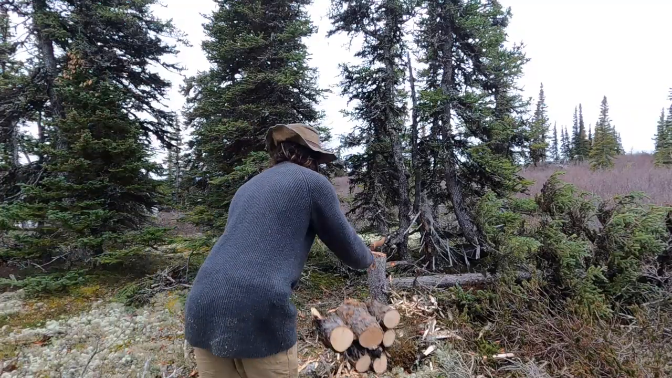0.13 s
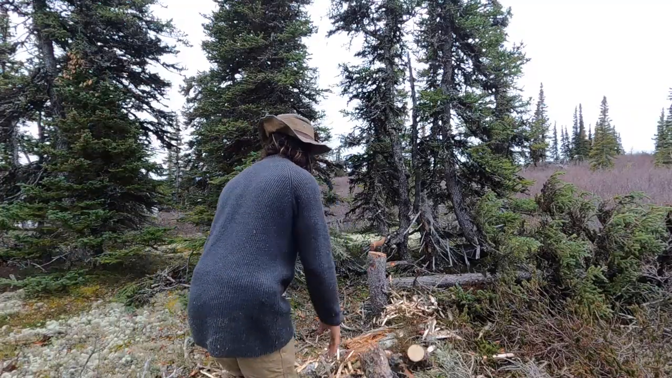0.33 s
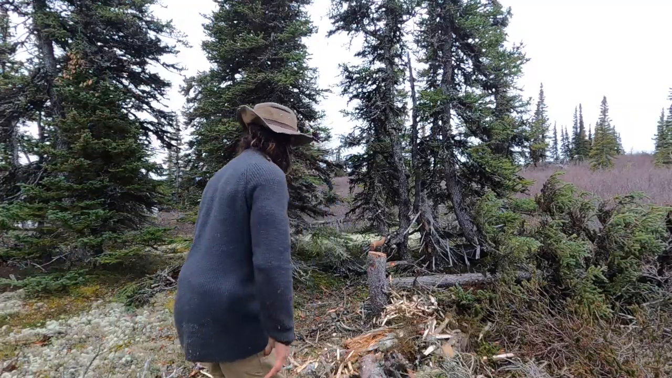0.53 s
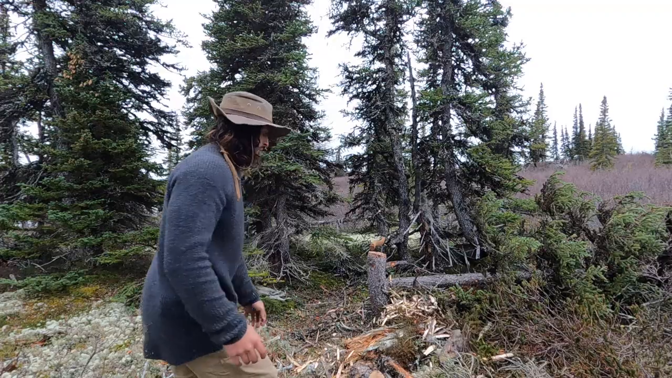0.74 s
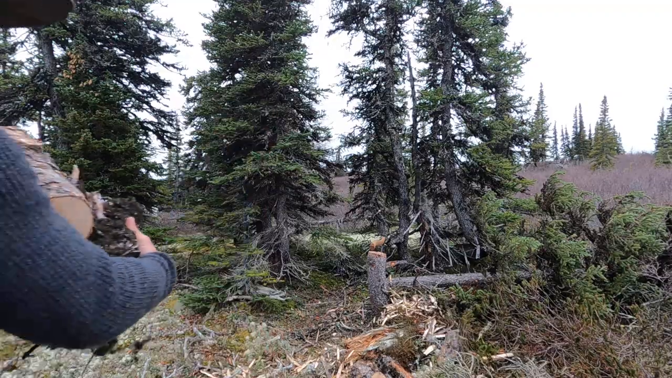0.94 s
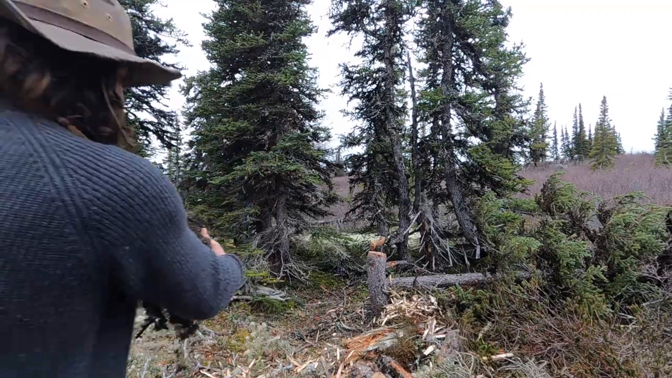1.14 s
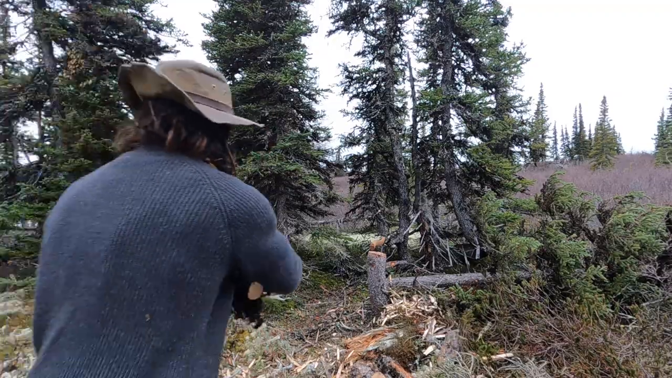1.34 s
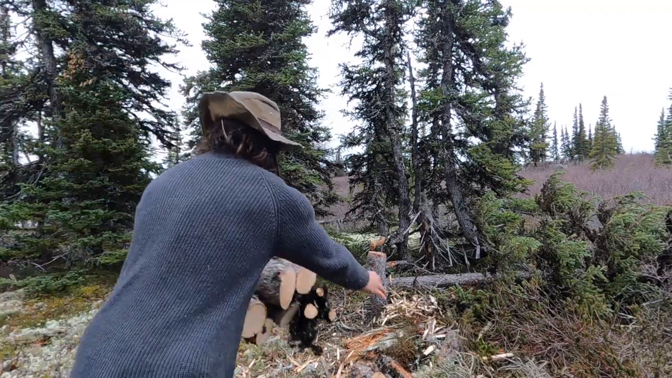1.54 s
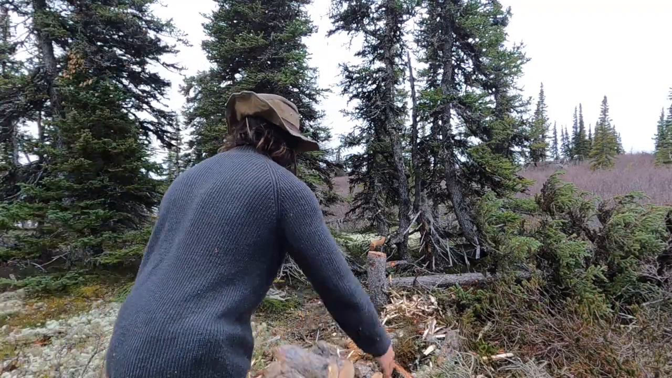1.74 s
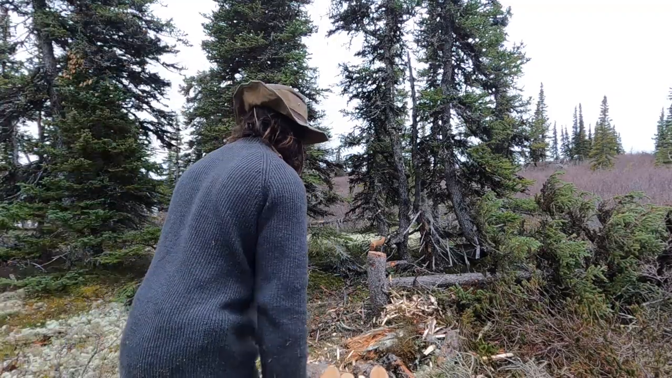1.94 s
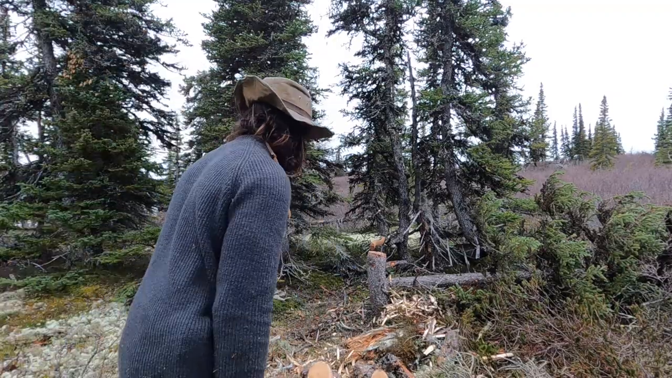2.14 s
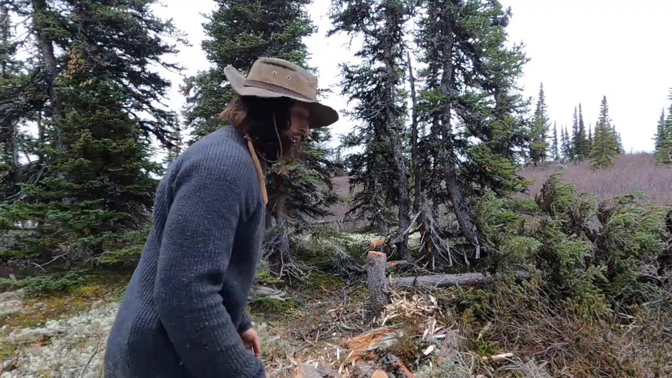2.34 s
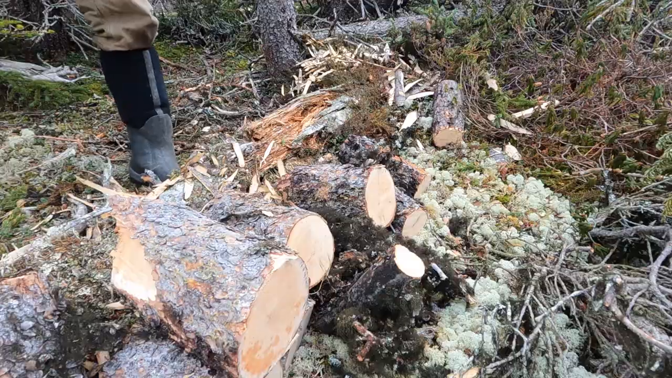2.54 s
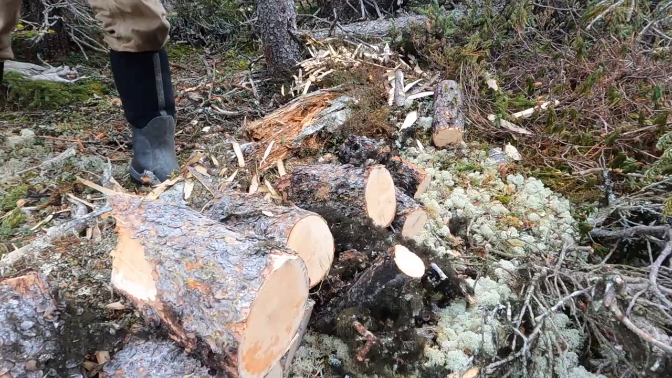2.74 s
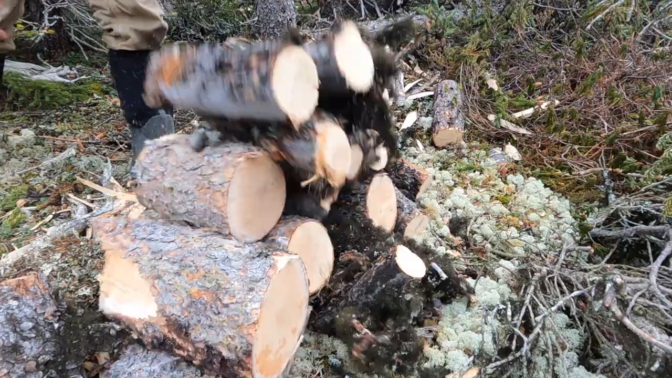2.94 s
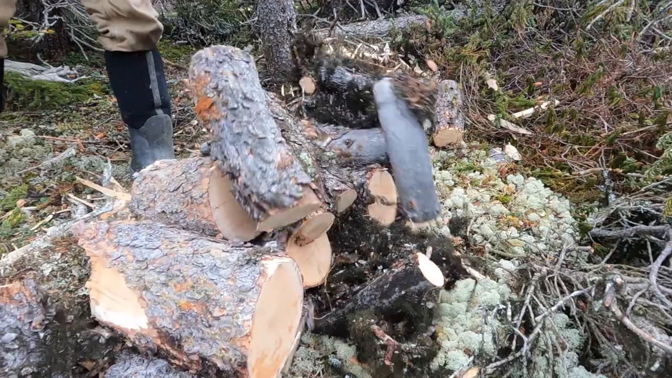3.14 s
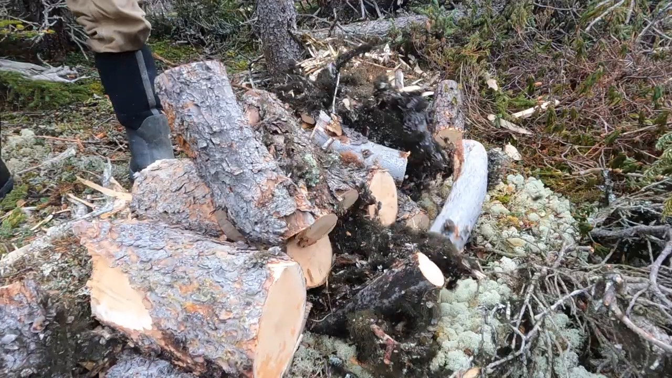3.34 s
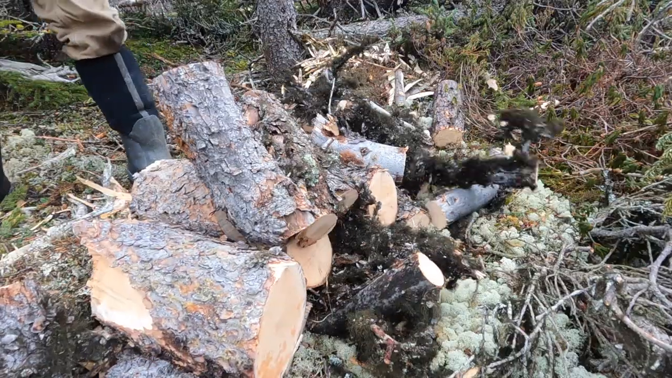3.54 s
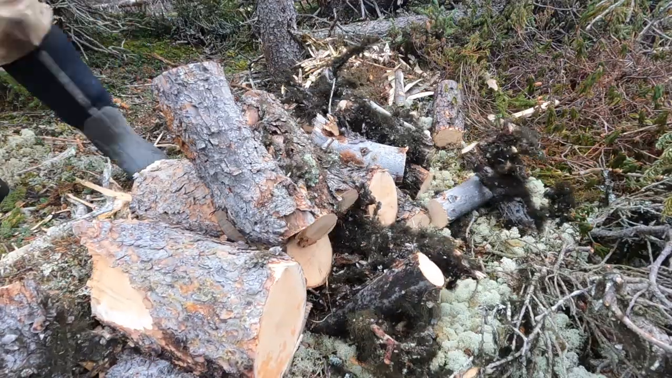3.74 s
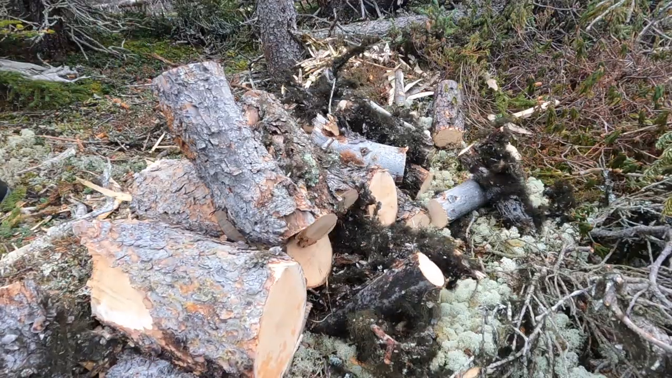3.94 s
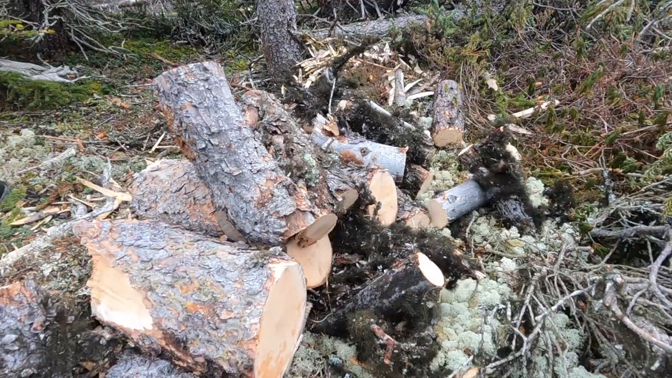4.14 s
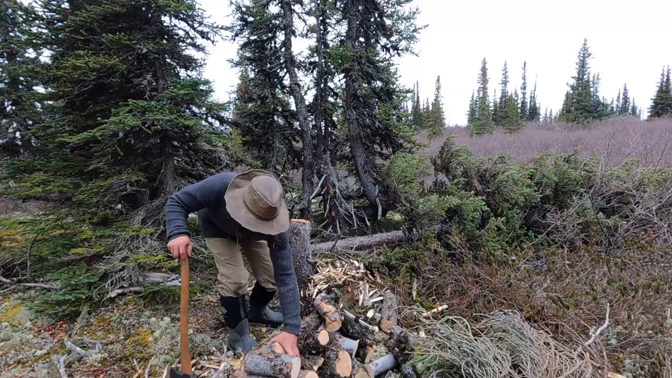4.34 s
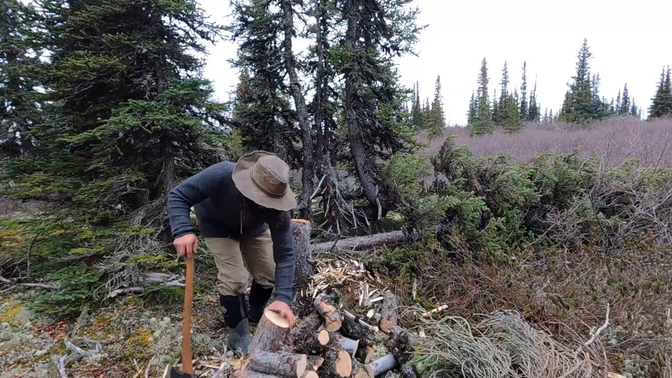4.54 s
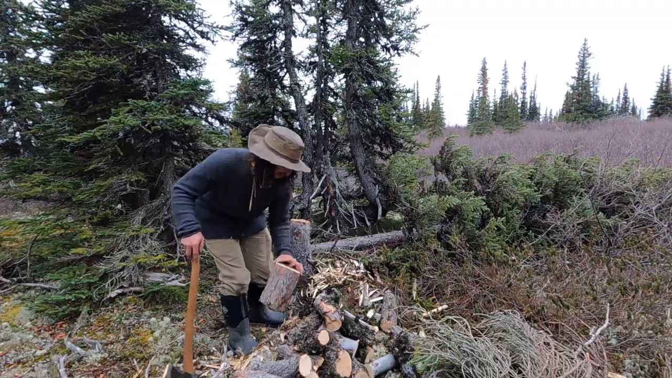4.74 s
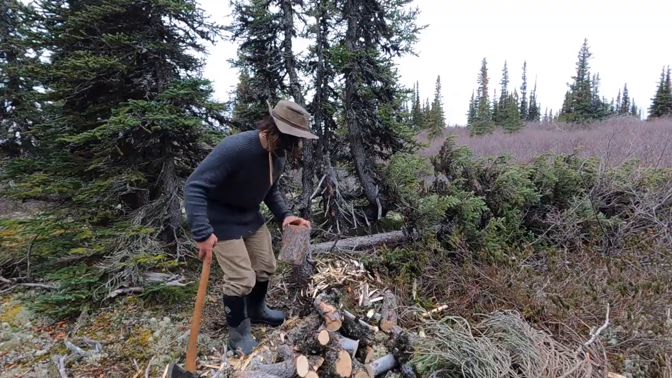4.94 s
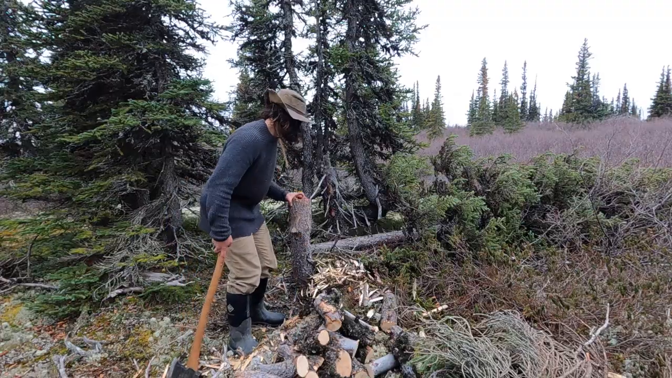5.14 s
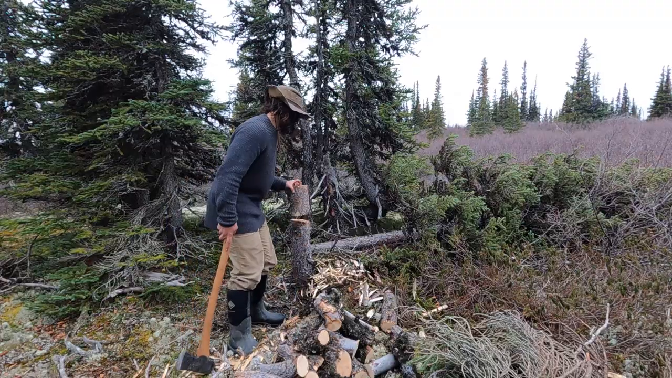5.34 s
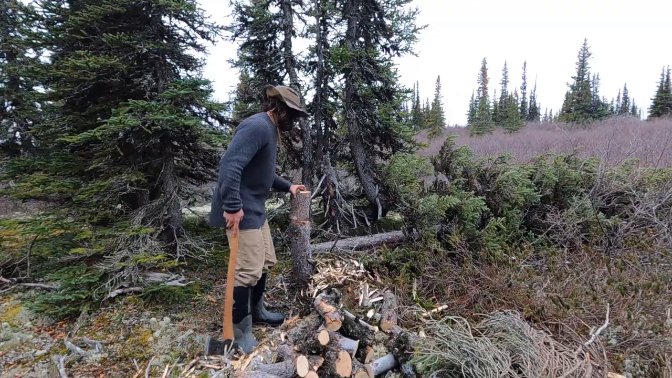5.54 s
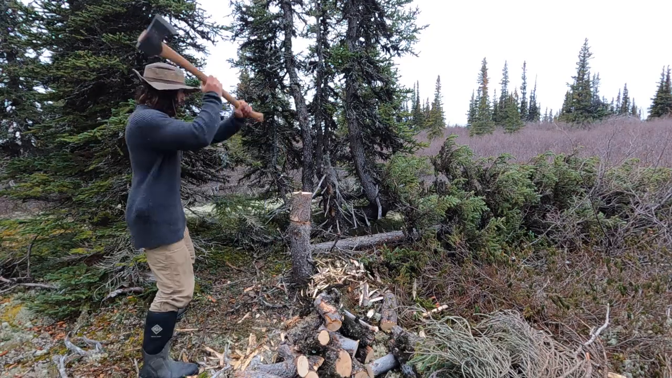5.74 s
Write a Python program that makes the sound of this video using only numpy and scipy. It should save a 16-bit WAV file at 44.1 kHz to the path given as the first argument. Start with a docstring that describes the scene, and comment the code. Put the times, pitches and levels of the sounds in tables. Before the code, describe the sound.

In an open forest with a faint breeze, cut logs thud onto a pile close by. Cloth and bark rustle among light knocks, then two more heavy loads tumble down, with crunching bark, snapping twigs and the clack of dry sticks. As the pile settles with small crackles, a far bird gives three short, thin calls. A single log clunks after the first call, and two soft knocks follow at the end.

```python
"""Armfuls of fresh log rounds are dropped on a pile in an open forest, air moving in the trees.
The first lands at 0.3 s: short damped thuds while bark and twigs crack. Lighter knocks follow, then
heavy loads at 1.9 s and 3 s; bark grinds, dry sticks ring, and moss, brush and cloth rustle between.
The wood settles. From 4.7 s a far bird calls three times; one more round lands just after
its first call, and two faint knocks end the scene."""
import sys
import numpy as np
from scipy import signal
from scipy.fft import rfft, irfft
from scipy.io import wavfile
from scipy.ndimage import uniform_filter1d

SR = 44100
rng = np.random.default_rng(int(sys.argv[2]) if len(sys.argv) > 2 else 0)


def wav_record(signal):
    """Record a signal, one row per channel, as 16-bit PCM in the file named by sys.argv[1]."""
    frames = np.transpose(np.atleast_2d(signal))
    bounded = np.clip(frames, -1, 1)
    # unit amplitude maps onto the largest positive 16-bit level
    quanta = np.round(bounded * 32767).astype(np.int16)
    wavfile.write(sys.argv[1], SR, quanta)


N = 254748

# handling and air: time_s, rustle_db, rush_db
STIR = [(0, -44.5, -55), (0.25, -49, -45.5), (0.45, -35.5, -52), (0.7, -40, -54), (0.9, -32, -43.5),
        (0.98, -41, -49), (1.1, -26.5, -40), (1.3, -32.5, -44), (1.4, -41.5, -50), (1.73, -40.5, -45.5),
        (2.0, -40.5, -50), (2.34, -45.5, -53), (2.58, -41, -52.5), (3.02, -45.5, -56), (3.28, -34.5, -42.5),
        (3.43, -34.5, -63), (3.65, -41, -58.5), (4.0, -51.5, -54.5), (4.55, -52.5, -52.5),
        (4.8, -43.5, -50.5), (5.13, -56, -52.5), (5.776, -69, -52.5)]
# rounds on wood or ground: start_s, level_db, pitch_hz, thump_db (pile, re level)
THUDS = [(0.3255, -14.5, 300, -8.5), (0.3393, -4, 590, -11), (0.3527, -22, 357, -4),
         (0.8209, -30.5, 288, -12), (0.8339, -25.5, 670, -8.5), (0.8516, -35, 385, -14),
         (1.04, -31.5, 397, -14), (1.097, -20.5, 626, -15), (1.2211, -29, 560, -16),
         (1.265, -24, 577, -12.5), (1.2876, -33.5, 447, -6.5), (1.401, -38.5, 310, -11.5),
         (1.6312, -36.5, 380, -23), (1.7713, -25, 466, -12.5), (1.7778, -28, 348, -10),
         (1.827, -11.5, 480, -9), (1.844, -16.5, 670, -37), (1.8709, -20, 570, -5.5), (1.888, -3, 705, -10),
         (1.9034, -20.5, 217, -3.5), (2.0469, -38.5, 336, -7), (3.0349, -33, 274, -4),
         (3.0481, -11, 242, -9), (3.0635, -18, 235, -2.5), (3.0894, -21, 277, -3.5),
         (3.1034, -18, 407, -25), (3.1144, -26.5, 320, -19), (3.1237, -31.5, 306, -6),
         (3.1655, -28, 262, -7), (3.2502, -46.5, 273, 0), (3.32, -32.5, 324, -7), (3.3501, -39, 244, -9.5),
         (3.4802, -34, 310, -19), (3.617, -41, 280, -12), (3.6351, -34.5, 543, -10.5),
         (4.8234, -11, 442, -14.5), (5.6851, -37.5, 510, -16), (5.7261, -38.5, 226, -2)]


def from_db(db):
    return 10 ** (np.asarray(db) / 20)


def rms_one(x):
    return x / np.sqrt(np.mean(x ** 2) + 1e-20)


def colour(x, points):
    """Weights the spectrum by (freq_hz, gain_db) points."""
    hz, db = np.transpose(points)
    grid_hz = np.maximum(np.arange(N // 2 + 1) * SR / N, 1)
    return irfft(rfft(x) * from_db(np.interp(np.log(grid_hz), np.log(hz), db)), N)


def drift(rate_hz):
    """Low-passed noise, rms 1."""
    r = np.exp(-2 * np.pi * rate_hz / SR)
    return rms_one(signal.lfilter([1], [1, -2 * r, r * r], rng.standard_normal(N + SR))[SR:])


def resonance(x, hz, width_hz):
    """Two-pole band-pass, peak gain 1."""
    r = np.exp(-np.pi * width_hz / SR)
    poles = [1, -2 * r * np.cos(2 * np.pi * hz / SR), r * r]
    return signal.lfilter((1 - r * r) / 2 * np.array([1, 0, -1]), poles, x)


def add(out, start_s, sound):
    i = round(start_s * SR)
    out[i:i + len(sound)] += sound[:N - i]


def struck(hz, t60_ms, rise_cycles, glide):
    """Damped mode under a soft contact, peak 1; pitch settles from hz * (1 - glide) to hz."""
    t = np.arange(SR // 5) / SR
    tau_s = max(t60_ms, 4) / 1000 / np.log(1000)
    decay = np.exp(-t / tau_s)
    attack = (1 - np.exp(-t * hz / rise_cycles)) ** 2
    cycles = hz * (t - glide * tau_s * (1 - decay))
    sound = -attack * decay * np.sin(2 * np.pi * cycles)
    return sound / np.abs(sound).max()


def grains(per_s, spread_db, clump_db, hiss_db, spectrum):
    """Dense clumped ticks over a smooth hiss, rms 1."""
    born = rng.random(N) < per_s * from_db(clump_db * drift(25)) / SR
    sizes = from_db(spread_db * np.minimum(rng.exponential(1, N), 5))
    ticks = born * sizes * rng.choice([-1, 1], N)
    hiss = from_db(hiss_db) * rng.standard_normal(N)
    return rms_one(colour(rms_one(ticks) + hiss, spectrum))


def rush(level_db, flicker_db):
    """Dull noise of air in the trees and of moving cloth."""
    # air spectrum: freq_hz, gain_db
    spectrum = [(40, -46.5), (100, -35), (130, -14.5), (160, -18), (300, -5.5), (550, 0), (900, -4.5),
                (1500, -4.5), (3000, -11), (6000, -24)]
    noise = colour(rng.standard_normal(N), spectrum)
    return from_db(level_db) * rms_one(noise * from_db(flicker_db * drift(10)))


def bird(blur):
    """Two whistles at once, made unsteady by distance."""
    # calls: start_s, level_db, upper_hz, upper_rise_hz_per_s, end_jump_hz, lower_hz, lower_rise_hz_per_s
    calls = [(4.722, -50, 3980, 2400, 0, 3300, 0), (5.15, -60, 3900, 0, 400, 3100, 2300),
             (5.435, -65, 4030, 1000, 300, 3200, 2300)]
    call_s, jump_s, edge_s, lower_db = .09, .03, .012, -4
    out, t = np.zeros(N), np.arange(0, call_s, 1 / SR)
    envelope = np.clip(np.minimum(t, call_s - t) / edge_s, 0, 1)
    jump = np.sqrt(np.clip(1 - (call_s - t) / jump_s, 0, 1))
    for start_s, db, upper_hz, upper_rise, jump_hz, lower_hz, lower_rise in calls:
        high_hz = upper_hz + upper_rise * t + jump_hz * jump
        low_hz = lower_hz + lower_rise * t
        for hz, voice_db in ((high_hz, db), (low_hz, db + lower_db)):
            add(out, start_s, from_db(voice_db) * envelope * np.sin(2 * np.pi * np.cumsum(hz) / SR))
    return out * (1 + blur * drift(40))


def rustle(level_db):
    """Fine grains of handled bark, moss and cloth."""
    # rustle spectrum: freq_hz, gain_db
    spectrum = [(300, -13), (900, -33), (1600, -6.5), (3000, -2), (5000, -5.5), (8000, -9.5), (15000, 0)]
    return from_db(level_db) * grains(per_s=2500, spread_db=4, clump_db=5, hiss_db=-5, spectrum=spectrum)


def bumps(stir_db):
    """Small random knocks of carried and settling wood, growing with the stir."""
    per_s, ring_cycles = 120, 6
    base_db, db_per_stir_db = -63, 1.7
    kicks = (rng.random(N) < per_s / SR) * from_db(3 * np.minimum(rng.exponential(1, N), 3))
    pitch_index = rng.integers(0, 12, size=N)
    rings = sum(resonance(kicks * (pitch_index == k) + 1e-18, hz, 2.2 * hz / ring_cycles) / np.sqrt(hz)
                for k, hz in enumerate(np.geomspace(320, 3200, num=12)))
    return from_db(base_db + db_per_stir_db * (stir_db - stir_db.mean())) * rms_one(rings)


def crunch():
    """Bark grinds in coarse grains as a load lands or slides."""
    # slides: peak_s, swell_s, fade_s, level_db
    slides = [(0.332, .023, 0.023, -12), (0.361, .008, 0.034, -29.5), (0.816, 0.013, 0.036, -28),
              (0.93, 0.097, 0.04, -36.5), (1.044, 0.027, .012, -29.5), (1.15, 0.11, 0.24, -32),
              (1.69, .05, .05, -39.5), (1.876, 0.039, 0.042, -10), (1.909, 0.023, 0.039, -27.5),
              (2.062, 0.039, 0.036, -33), (2.796, 0.092, 0.21, -37.5), (3.056, 0.032, 0.17, -16.5),
              (3.085, 0.008, 0.035, -15), (3.17, 0.03, 0.46, -32), (3.6, 0.023, 0.14, -40),
              (3.711, 0.013, 0.024, -46), (3.79, .015, 0.071, -44.5), (4.116, 0.034, 0.062, -44.5),
              (4.386, 0.016, 0.045, -44), (4.919, 0.037, 0.11, -41)]
    # grinding spectrum: freq_hz, gain_db
    spectrum = [(150, -42), (600, -4.5), (1500, 1), (4000, -1), (8000, -8), (15000, -6.5)]
    t = np.arange(N) / SR
    pressure = sum(from_db(db) * np.interp(t, [peak_s - swell_s, peak_s, peak_s + fade_s], [0, 1, 0]) ** 2
                   for peak_s, swell_s, fade_s, db in slides)
    return pressure * grains(per_s=2500, spread_db=3.5, clump_db=4, hiss_db=-7, spectrum=spectrum)


def cracks(ring_q, rise_ms):
    """Fibres break in a spiky burst: a short ring of the piece plus bright splinters."""
    # bark and twig breaks: start_s, level_db, centre_hz, t60_ms, splinter_db (re level)
    breaks = [(0.3292, -27, 2200, 56, -17), (0.3392, -23, 4000, 12, -10), (0.3553, -15, 2800, 10.4, -1),
              (0.4356, -30, 2930, 55, -12), (0.493, -35, 2980, 11, 2), (0.5334, -29.5, 2750, 15, -1),
              (0.5576, -34.5, 3460, 90, 4.5), (0.731, -27.5, 2800, 5.8, -2), (0.7476, -32.5, 3570, 9.1, -9),
              (0.781, -33.5, 2070, 5.7, -20), (0.8169, -42, 1760, 20, -12), (1.0115, -35, 1380, 19, -22),
              (1.0964, -21.5, 1670, 32, -13), (1.1217, -25.5, 2340, 4.3, 9.5),
              (1.1487, -19.5, 3070, 5.5, -17), (1.1609, -20, 2760, 6.2, -21), (1.2627, -25, 2030, 22, -15),
              (1.4542, -30, 2470, 3, 3), (1.769, -34.5, 1450, 15, -18), (1.8265, -25.5, 2670, 30, -12.5),
              (1.8314, -18, 4000, 21, -23), (1.8422, -12, 2300, 39, 3), (1.8649, -9, 4700, 19, -15.5),
              (1.88, -11, 2670, 5.6, -24), (1.8895, -20, 1520, 13, -7), (1.895, -14.5, 3250, 16, -9),
              (2.1164, -35, 2750, 67, 3), (2.2257, -39.5, 3200, 68, 6), (2.2695, -38, 3000, 68, -6),
              (2.313, -49.5, 6000, 7.9, 16), (2.3751, -34.5, 2620, 6.5, 0), (2.408, -40, 2690, 31, 8),
              (2.567, -34.5, 2830, 50, -4), (2.5968, -24, 2110, 3.4, -9), (2.615, -38, 2960, 13, -8),
              (2.7124, -32, 3220, 23.5, 16.5), (2.7462, -30.5, 3820, 35, -16), (2.8077, -39, 2450, 11, 17),
              (3.0366, -29, 3260, 21, -7), (3.047, -5, 3000, 27, -0.5), (3.0539, -12.5, 2930, 62, 1),
              (3.089, -15.5, 3280, 97, 2), (3.1134, -8, 3380, 22, 3.5), (3.126, -18, 3450, 8, -0.5),
              (3.1341, -16.5, 1930, 16, 3), (3.1632, -19.5, 1750, 3.6, 10.5), (3.17, -17, 2420, 69, 1.5),
              (3.196, -28, 2320, 36, -20), (3.208, -23, 1590, 34, -10), (3.2293, -26, 2210, 12, -17),
              (3.2529, -19.5, 2220, 19, -5), (3.261, -27.5, 3140, 41, 9.5),
              (3.3428, -10.5, 3000, 11.3, -3.5), (3.375, -32, 2330, 32, 12), (3.4094, -32, 2250, 8.2, -5),
              (3.417, -37, 4200, 8, -8), (3.4468, -28.5, 3330, 11, 0), (3.4538, -28.5, 2430, 13, 6),
              (3.4814, -22.5, 1670, 22, -13), (3.531, -32, 3330, 12, -1), (3.5921, -37.5, 2200, 17, 9),
              (3.705, -33.5, 4900, 13, 5), (3.7144, -28.5, 4600, 11.5, -12), (3.7224, -35, 4000, 5.8, -7),
              (3.792, -49, 2640, 31, 14), (4.025, -50, 5200, 12, -3), (4.3585, -37, 3700, 50, 3),
              (4.4543, -42.5, 3320, 14, -4), (4.4715, -36, 3130, 26, -5), (4.587, -46, 4500, 21, -3),
              (4.63, -42.5, 1670, 40, 4), (4.6696, -29, 4000, 7.7, -23), (4.6794, -30, 2800, 17, -13),
              (4.6898, -26.5, 2800, 5.5, -19), (4.7115, -37.5, 2210, 25, -12), (4.7837, -41, 2760, 12, -21),
              (4.8236, -31.5, 2790, 58, -7), (4.8462, -37.5, 2440, 20, -20), (4.9002, -31, 2500, 16, -6),
              (4.9094, -23.5, 3250, 5.4, -6), (4.9166, -21, 3300, 27, -10), (4.954, -33, 3760, 10, 0),
              (4.972, -36, 2630, 54, -4), (5.0756, -44, 3820, 13, 3.5), (5.604, -44, 2400, 27, -6),
              (5.723, -46, 2950, 27, 5)]
    out, t = np.zeros(N), np.arange(SR // 10) / SR
    for start_s, db, hz, t60_ms, splinter_db in breaks:
        attack = 1 - np.exp(-1000 * t / rise_ms)
        burst = rng.laplace(size=len(t)) * attack * from_db(-60000 * t / max(t60_ms, 3))
        ring = resonance(resonance(burst, hz, hz / ring_q), hz, 3 * hz)
        splinters = resonance(burst, hz=9600, width_hz=8100)
        for sound, level_db in ((ring, db), (splinters, db + splinter_db)):
            peak_rms = np.sqrt(uniform_filter1d(sound ** 2, size=66).max())  # loudest 1.5 ms
            add(out, start_s, from_db(level_db) * sound / peak_rms)
    return out


def sticks():
    """Dry sticks ring with a clear pitch."""
    # stick hits: start_s, level_db, pitch_hz, t60_ms, upward_glide_ratio
    hits = [(.917, -27, 2770, 74, 0.31), (1.494, -21, 1960, 17, 0.13), (1.866, -14, 1443, 33, 0),
            (1.87, -9, 6200, 17, 0.02), (2.194, -42, 1050, 21, 0.02), (2.805, -32, 2030, 40, 0),
            (2.711, -23.5, 2950, 20, 0.01), (3.046, -11, 1240, 22, 0), (3.114, -16.5, 1640, 15, 0.02),
            (3.135, -16.5, 1610, 25, 0), (3.162, -24, 1680, 54, 0), (3.17, -17, 1570, 37, 0),
            (5.683, -31, 2080, 9.2, 0.1)]
    out = np.zeros(N)
    for start_s, db, hz, t60_ms, glide in hits:
        add(out, start_s, from_db(db) * struck(hz, t60_ms, rise_cycles=1.9, glide=glide))
    return out


def pile():
    """The pile shakes under each round; heavier blows reach deeper."""
    # pile modes: pitch_hz, gain_db, t60_ms, db_per_thump_db
    modes = [(197.6, 7.5, 47.5, 2.5), (96, 8, 72, 3.5)]
    out = np.zeros(N)
    for hz, gain_db, t60_ms, db_per_thump_db in modes:
        ring = struck(hz, t60_ms, rise_cycles=0.4, glide=-0.032)
        for start_s, db, _, thump_db in THUDS:
            add(out, start_s, from_db(db + gain_db + db_per_thump_db * thump_db) * ring)
    return out


def rounds(clack_db):
    """Each round thuds with a sagging pitch and a rough clack, longer when the pile shakes with it."""
    t60_cycles, stretch_per_thump = 8.5, 0.44
    out, t = np.zeros(N), np.arange(SR // 20) / SR
    for start_s, db, hz, thump_db in THUDS:
        t60_ms = 1000 * t60_cycles / hz * from_db(stretch_per_thump * thump_db)
        add(out, start_s, from_db(db) * struck(hz, t60_ms, rise_cycles=0.43, glide=-0.34))
        burst = rng.standard_normal(len(t)) * from_db(-60000 * t / t60_ms)
        clack_hz, width_hz = 1.74 * hz, 0.99 * hz
        clack = resonance(resonance(burst, clack_hz, width_hz), clack_hz, width_hz)
        add(out, start_s, from_db(db + clack_db) * clack / np.abs(clack).max())
    return out


def scene():
    """All sources centred."""
    time_s, rustle_db, rush_db = np.transpose(STIR)
    t = np.arange(N) / SR
    rustle_db, rush_db = np.interp(t, time_s, rustle_db), np.interp(t, time_s, rush_db)
    bed = rustle(rustle_db) + rush(rush_db, flicker_db=.7)
    wood = rounds(clack_db=-8.5) + pile() + sticks()
    wood *= 1 + .12 * drift(150)  # loose bark makes it uneven
    debris = cracks(ring_q=1.56, rise_ms=0.23) + crunch() + bumps((rustle_db + rush_db) / 2)
    return np.tile(bed + bird(blur=.45) + debris + wood, (2, 1))


def record(dry):
    """Notched housing colour; top treble spreads unsteadily, leaning right; soft clip, low-pass."""
    # microphone housing response: freq_hz, gain_db
    housing = [(25, -9.5), (100, -7), (170, 6.5), (4200, -3), (6800, -6), (8500, -21), (9050, -32),
               (9600, -22), (12400, -24), (14200, -43), (16000, -63), (16400, -87)]
    spread_hz, scatter_db, right_share = 11000, -4, .25
    stop_hz = 16400
    mid = colour(dry[0], housing)
    top = colour(mid, [(spread_hz * .9, -60), (spread_hz, 0)])
    side = top * (from_db(scatter_db) * drift(300) - right_share)
    clipped = 1.604 * np.tanh(np.array([mid + side, mid - side]) / 1.62)
    return signal.sosfilt(signal.cheby2(12, 70, stop_hz, fs=SR, output="sos"), clipped)


dry = scene()
out = record(dry)
wav_record(out)
```